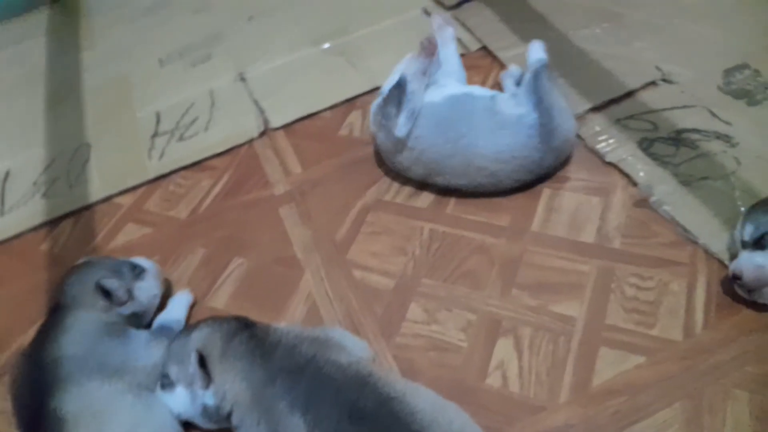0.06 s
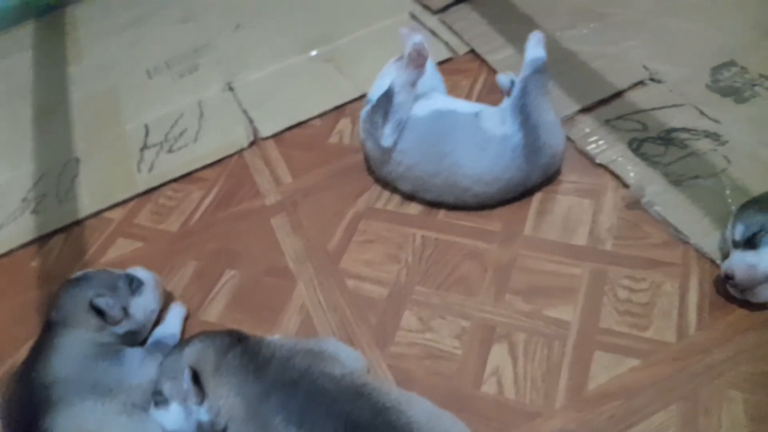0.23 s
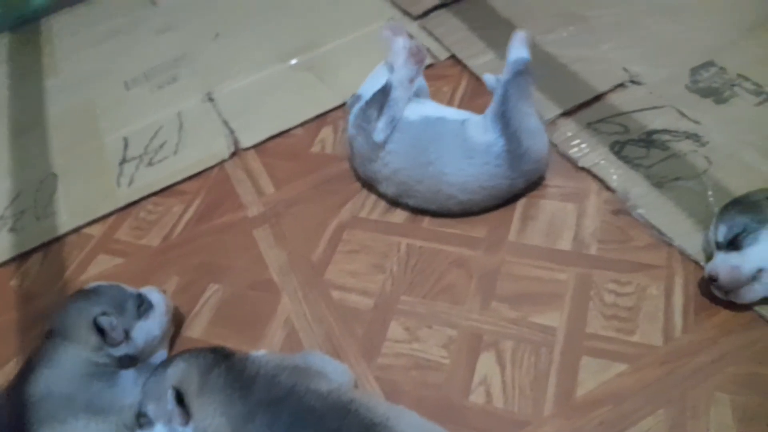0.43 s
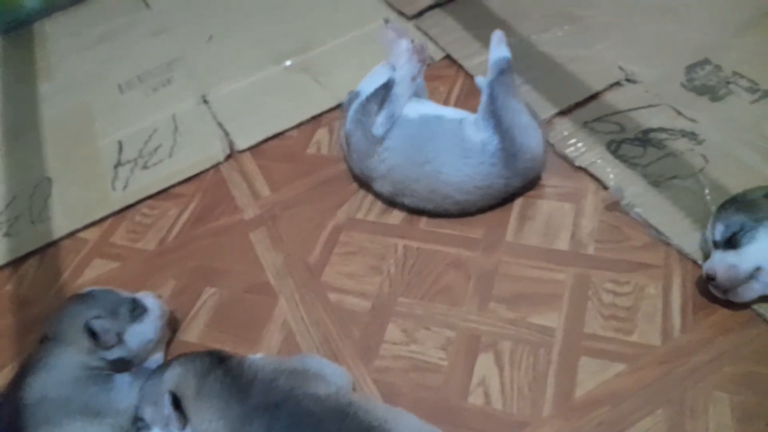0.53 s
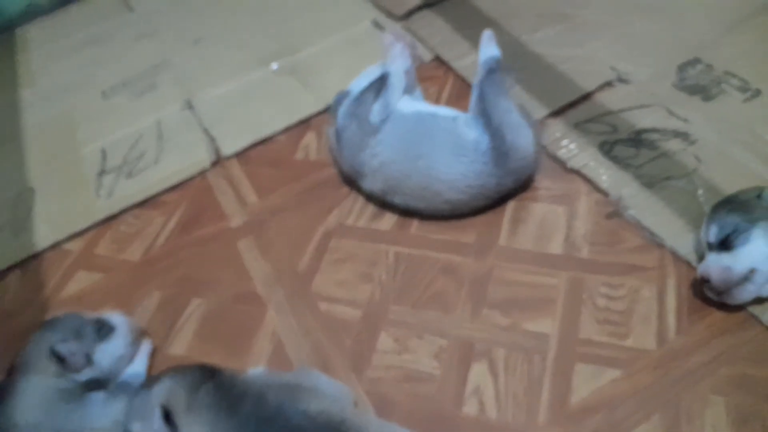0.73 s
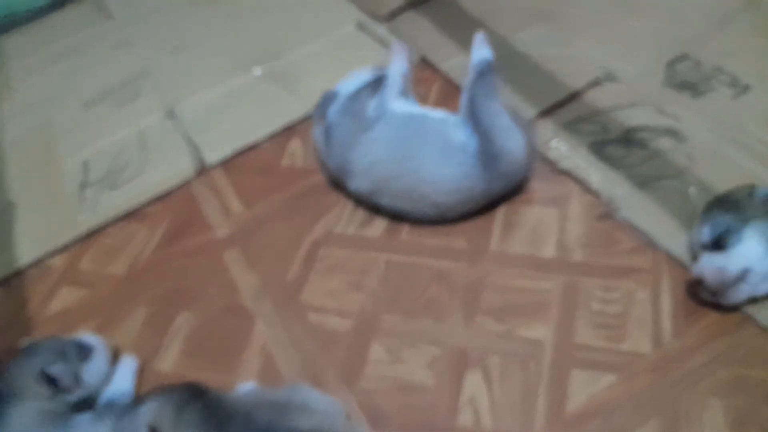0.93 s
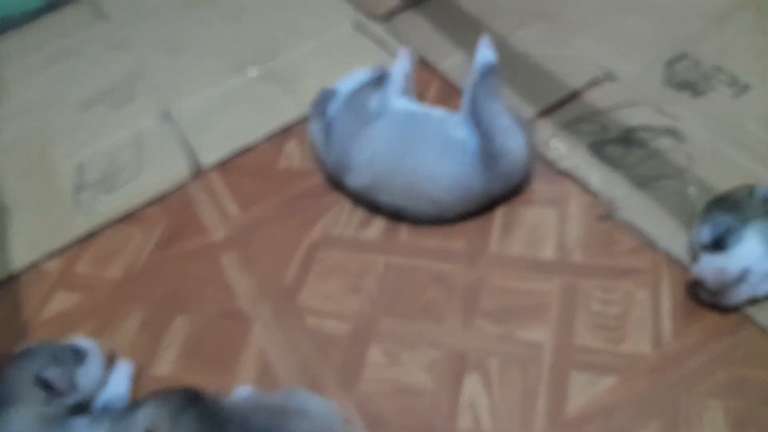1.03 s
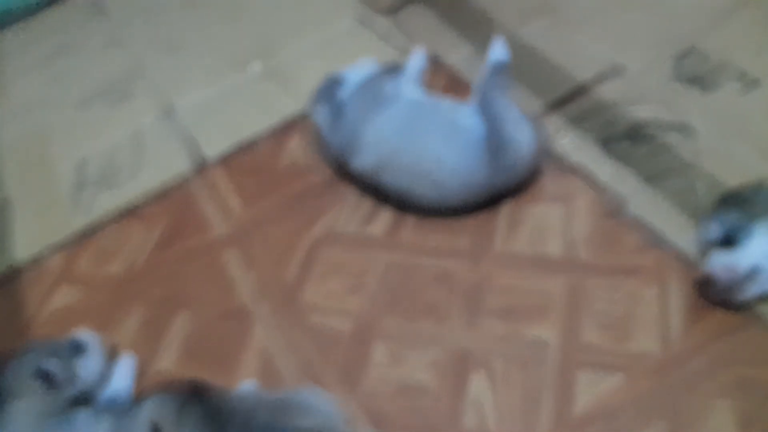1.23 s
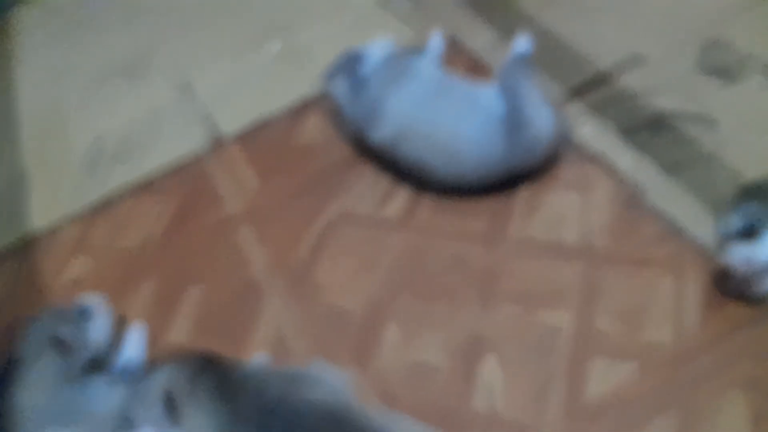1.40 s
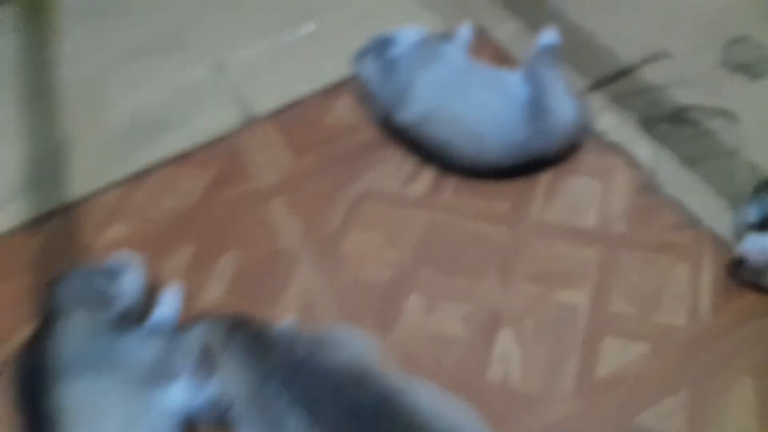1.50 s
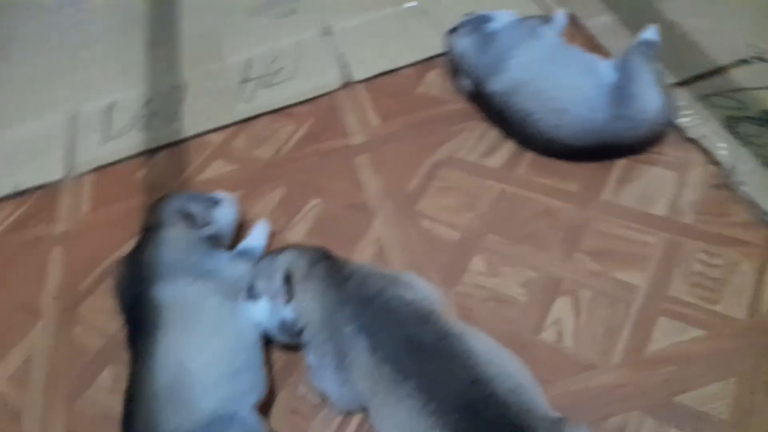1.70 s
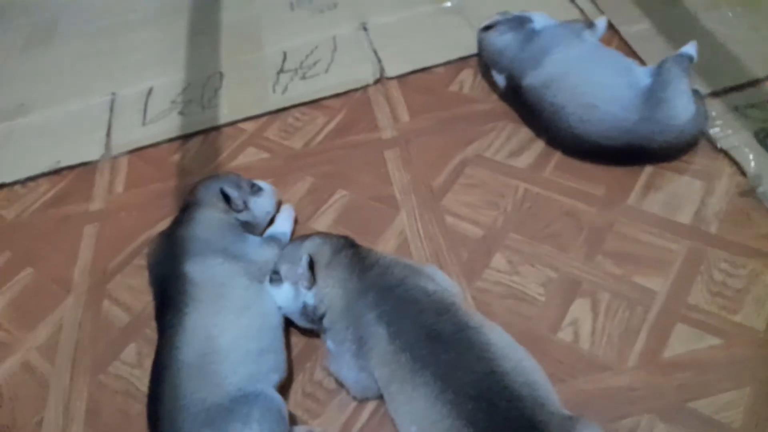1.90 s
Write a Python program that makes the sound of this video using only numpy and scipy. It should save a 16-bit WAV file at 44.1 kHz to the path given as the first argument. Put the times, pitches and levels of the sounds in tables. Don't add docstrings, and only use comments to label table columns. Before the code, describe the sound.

Two very short, sharp puppy yelps ring in a hard-floored room. Between them come a soft double knock on the floor and a barely audible fur rub, over steady low fan hum; automatic gain dips after each yelp.

```python
import sys
import numpy as np
from scipy import signal
from scipy.fft import rfft, irfft
from scipy.io import wavfile
from scipy.ndimage import uniform_filter1d, minimum_filter1d

SR = 44100
rng = np.random.default_rng(int(sys.argv[2]) if len(sys.argv) > 2 else 0)


def gain_from_db(level_db):
    decades = np.asarray(level_db, float) / 20
    return 10 ** decades


def pcm_store(signal):
    levels = np.round(np.clip(np.atleast_2d(signal), -1, 1) * 32767)
    wavfile.write(sys.argv[1], SR, levels.astype(np.int16).T)


N = 85995


def evened(x):
    return x / np.sqrt(np.mean(x ** 2) + 1e-20)


def read(points, hz):
    f, value = np.transpose(points)
    return np.interp(np.log(hz + 1), np.log(f + 1), value)


def add(mix, s, sound):
    part = mix[round(s * SR):][:len(sound)]
    part += sound[:len(part)]


def hump(s, length):
    t = np.arange(N) / SR
    return np.sin(np.pi * np.clip((t - s) / length, 0, 1))


def resonate(x, hz, width):
    turn = np.exp(2j * np.pi * np.cumsum(hz * np.ones(len(x))) / SR)
    r = np.exp(-np.pi * width / SR)
    smooth = signal.lfilter([1 - r], [1, -r], x / turn + 1e-18)
    return 2 * (turn * smooth).real


def folds(pitch):
    when, pitch_hz, rough = np.transpose(pitch)
    t = np.arange(N) / SR
    wobble = evened(uniform_filter1d(rng.standard_normal(N), size=120))
    hz = np.interp(t, when, pitch_hz) * (1 + .008 * wobble)
    turns = np.cumsum(hz) / SR
    clean = sum(np.cos(2 * np.pi * k * turns) for k in range(1, 11))
    ragged = np.exp(-(turns % 1) / 0.19) * rng.standard_normal(N)
    rough = np.interp(t, when, rough)
    return (1 - rough) * evened(clean) + 2 * rough * evened(ragged)


def yelp(rows, pitch, breath):
    # (pitch [Hz], width [Hz], level [dB])
    throat_rings = [(762, 622, -9), (1638, 778, 2.5), (2527, 1630, 3), (3270, 230, -22), (6130, 690, -48)]
    shut, muffle_db, breath_db, soft_s = 0.81, -4.5, -32.5, .004
    s, effort_db, mouth, chest_db = np.transpose(rows)
    t = np.arange(N) / SR
    drive = folds(pitch)
    opening = np.clip(np.interp(t, s, mouth), 0, 1)
    shift = shut + (1 - shut) * opening
    throat = 0
    for k, (hz, width, ring_db) in enumerate(throat_rings):
        if k == 0:
            ring_db = ring_db + np.interp(t, s, chest_db)
        if k > 1:
            ring_db = ring_db + muffle_db * (4 - opening)
        once = resonate(drive, hz * shift, width)
        twice = resonate(once, hz * shift, width)
        throat = throat + (-1) ** k * gain_from_db(ring_db) * twice
    sounding = (t > s[0]) * (t < s[-1])
    loudness = gain_from_db(np.interp(t, s, effort_db)) * sounding
    loudness = uniform_filter1d(loudness, size=round(soft_s * SR))
    return loudness * (2 * throat + gain_from_db(breath_db) * breath)


def yelps(breath):
    # (time [s], effort [dB], mouth opening [0-1], chest tone [dB])
    first_rows = [
        (.238, -50, 0.57, -24),
        (.247, -13, .0, -5.5),
        (.261, -12, 0.17, -7.5),
        (.271, -19, 0.41, -3.5),
        (.283, -14, 1, 1.5),
        (.297, -20, 0.06, -11.5),
        (.316, -15.5, 0.03, 8),
        (.33, -31.5, 0.8, 11),
        (.35, -38, 0, 10.5),
    ]
    second_rows = [
        (1.155, -46, 0.34, -4),
        (1.166, -21.5, 0.1, 3),
        (1.178, -14, 0.48, -3.5),
        (1.197, -12.5, 1, -1.5),
        (1.212, -16.5, 1, -5),
        (1.222, -9.5, 0.3, 2),
        (1.238, -22.5, 1, 6.5),
        (1.25, -33, 0.65, 14),
        (1.278, -41.5, .2, 15.5),
    ]
    # (time [s], pitch [Hz], roughness [0-1])
    first_glide = [(.24, 562, .3), (.249, 586, .26), (.26, 606, .24), (.272, 695, .16), (.284, 775, .1),
                   (.297, 910, .08), (.304, 946, .07), (.322, 944, .08), (.35, 610, .15)]
    second_glide = [(1.157, 660, .22), (1.178, 722, .2), (1.197, 800, .14), (1.212, 905, .1),
                    (1.221, 958, .08), (1.24, 952, .08), (1.25, 790, .12), (1.262, 620, .12),
                    (1.278, 600, .12)]
    return yelp(first_rows, first_glide, breath) + yelp(second_rows, second_glide, breath)


def air():
    # (pitch [Hz], level [dB])
    air_colour = [(1500, 3), (3500, 12), (6000, 1.5), (8000, -9), (12000, -6.5), (15000, -15)]
    spectrum = rfft(rng.standard_normal(N))
    return evened(irfft(spectrum * gain_from_db(read(air_colour, np.fft.rfftfreq(N, 1 / SR))), N))


def nose_puffs(breath):
    # (time [s], length [s], level [dB])
    snorts = [
        (0.306, 0.12, -44.5),
        (1.203, 0.16, -42),
    ]
    return breath * sum(gain_from_db(db) * hump(s, length) for s, length, db in snorts)


def knocks():
    # (time [s], level [dB], ring pitch [Hz])
    paw_hits = [
        (.474, -27, 313.6),
        (0.537, -37.5, 279),
    ]
    t60_s, attack_s = 0.082, 0.0086
    out, t = np.zeros(N), np.arange(5000) / SR
    for s, db, hz in paw_hits:
        ring = 0
        for ratio, strength in [(1, 1), (0.571, 0.54), (1.45, 0.15), (1.77, 0.41)]:
            ring = ring + strength * np.sin(2 * np.pi * hz * ratio * t)
        fade = gain_from_db(db - 60 * t / t60_s) * np.minimum(t / attack_s, 1)
        add(out, s, fade * ring)
    return out


def shuffle():
    # (time [s], length [s], level [dB])
    s, length, db = (.75, .12, -56)
    rub = signal.lfilter([1], [1, -.8], rng.standard_normal(N))
    rub = rub - uniform_filter1d(rub, size=60)
    return gain_from_db(db) * evened(rub) * hump(s, length)


def hiss():
    # (pitch [Hz], level [dB])
    hiss_colour = [(44, -44), (62, -6), (190, -4), (800, -4.5), (2500, -12.5), (6800, -24.5), (8200, -30.5),
                   (13500, -31)]
    # (pitch [Hz], likeness [0-1])
    likeness = [(50, .82), (130, .97), (290, .78), (640, .6), (1400, .08), (15000, 0)]
    # (pitch [Hz], left over right [dB])
    balance = [(60, -6), (150, -8), (380, 2), (950, -2), (2380, -8.5), (5970, -6.0), (15000, 0)]
    hiss_db, patch_db = -42, 1.9
    frames, hz = N // 512 + 5, np.fft.rfftfreq(2048, 1 / SR)
    a, b, c, d, patches = rng.standard_normal((frames, 1025, 5)).T
    patches = uniform_filter1d(patches, size=20, axis=0)
    patches = evened(uniform_filter1d(patches, size=6, axis=1))
    same = np.clip(read(likeness, hz), -1, 1)[:, None]
    left = a + 1j * b
    right = same * left + np.sqrt(1 - same ** 2) * (c + 1j * d)
    sides = np.array([.5, -.5])[:, None, None]
    colour_db = read(hiss_colour, hz)[:, None] + patch_db * patches
    colour_db = colour_db + sides * read(balance, hz)[:, None]
    z = np.array([left, right]) * gain_from_db(colour_db)
    out = signal.istft(z, nperseg=2048, noverlap=1536)[1][:, :N]
    return gain_from_db(hiss_db) * evened(out)


def hum():
    # (pitch [Hz], width [Hz], level [dB], left over right [dB], share of the swing [0-1])
    hum_lines = [(74, 5.3, -51, -3.5, 0.6), (150.1, 10, -44, -0.5, 0.94), (283, 2.5, -53, -1.5, 0.9),
                 (358.3, 2.3, -61.5, -18, 0), (577, 9.2, -65.5, -9, 0)]
    # (time [s], level [dB])
    swing = [
        (0, -18.5),
        (.22, 2.5),
        (.3, 3),
        (.62, -5),
        (.75, -1.5),
        (1.15, -2.5),
        (1.25, -9),
        (1.68, -3.5),
        (1.75, -4),
        (1.95, 1),
    ]
    steady = 0.88
    t = np.arange(N) / SR
    swing_db = np.interp(t, *np.transpose(swing))
    out = np.zeros((2, N))
    for hz, width, db, lean_db, share in hum_lines:
        waver = evened(resonate(rng.standard_normal(N + SR), hz, width)[SR:])
        line = waver * (1 - steady) + steady * np.sin(2 * np.pi * hz * t)
        sides_db = np.array([[.5], [-.5]]) * lean_db
        out = out + gain_from_db(db + sides_db + share * swing_db) * line
    return out


def room(x):
    # (delay [s], left gain, right gain)
    early_echoes = [(.0011, .4, -.4), (.002, -.3, .35), (.003, .3, -.3), (.0046, .3, .3), (.0065, -.35, .3),
                    (.011, .3, .35), (.016, .3, -.35), (.022, -0.21, 1), (.029, 0.23, 0.56),
                    (.037, 0.71, -.3)]
    # (pitch [Hz], time to fall 60 dB [s])
    decay_times = [(300, 0.4), (900, 0.4), (1600, 0.39), (2500, 0.46), (4000, 0.16), (9000, 0.19)]
    tail_db, tail_start_s, lead_s = 1.93, 0.011, 0.00028
    direct = (0.00027, gain_from_db(-3), gain_from_db(4.2))
    taps = np.zeros((2, SR))
    at = np.arange(0, SR - 20, 20) + rng.integers(0, 20, (2, (SR - 1) // 20))
    np.put_along_axis(taps, at, rng.choice([-1., 1.], at.shape), 1)
    hz, t, z = signal.stft(taps, SR, nperseg=256)
    fade = gain_from_db(-60 * t / read(decay_times, hz)[:, None])
    tail = signal.istft(z * fade, SR, nperseg=256)[1][:, :SR]
    tail = tail * np.clip(np.arange(SR) / SR / tail_start_s - 1, 0, 1)
    tail = gain_from_db(tail_db) * tail / np.linalg.norm(tail[0])
    n = np.arange(4096)
    for s, left, right in [direct] + early_echoes:
        tail[0, :4096] += left * np.sinc(n - 8 - (s + lead_s) * SR)
        tail[1, :4096] += right * np.sinc(n - 8 - s * SR)
    return signal.fftconvolve(x[None], tail, axes=1)[:, :N]


def scene():
    breath = air()
    paw = knocks()
    puppy = yelps(breath) + nose_puffs(breath)
    echoing = room(puppy + gain_from_db(-8) * paw + shuffle())
    return echoing + hiss() + hum() + paw


def band_limit(x):
    return signal.sosfilt(signal.butter(12, 15400, fs=SR, output="sos"), x)


def record(dry):
    # (time [s], level [dB])
    auto_gain = [
        (0, 5.5),
        (0.248, 7),
        (.29, -1),
        (.43, 0.7),
        (.55, 2.1),
        (1.189, 0.77),
        (1.228, -2),
        (1.36, -2),
        (1.48, 0.5),
        (1.95, 1.2),
    ]
    ceiling, limit_s, edge_hz = .96, .006, 15180
    s, db = np.transpose(auto_gain)
    x = dry * gain_from_db(np.interp(np.arange(N) / SR, s, db))
    span = round(limit_s * SR)
    room_left = np.minimum(ceiling / (abs(x) + 1e-9), 1)
    duck = minimum_filter1d(room_left, size=2 * span + 1, axis=1)
    duck = uniform_filter1d(duck, size=span, axis=1)
    x = x * uniform_filter1d(duck, size=span, axis=1)
    treble_cut = signal.firwin(1023, edge_hz, window=("kaiser", 10), fs=SR)
    x = signal.oaconvolve(x, treble_cut[None], "same")
    return band_limit(x)


dry = scene()
out = record(dry)
pcm_store(out)
```